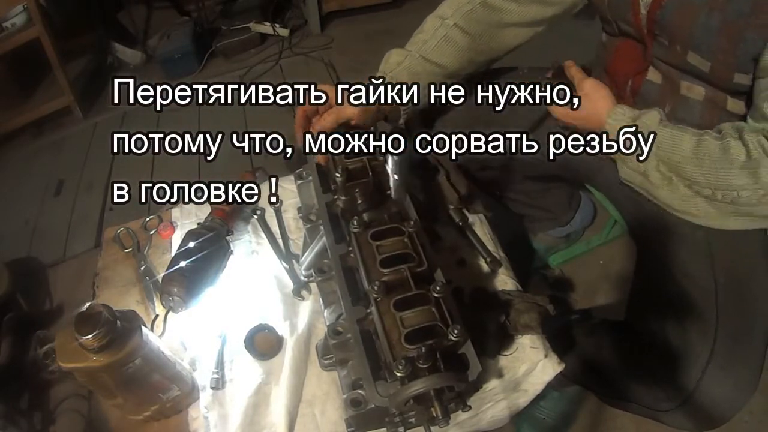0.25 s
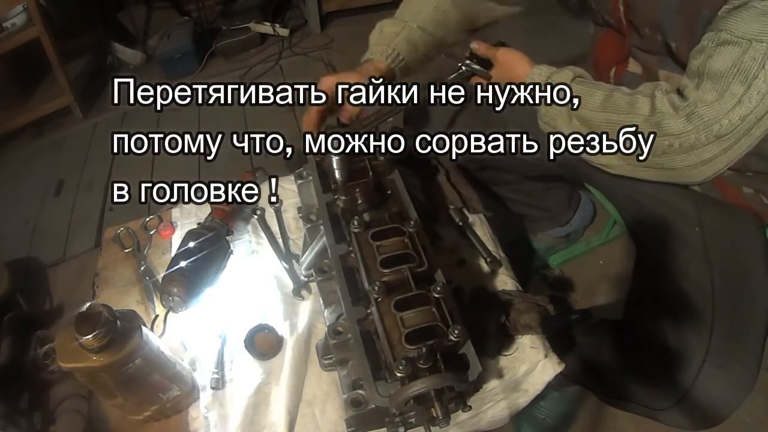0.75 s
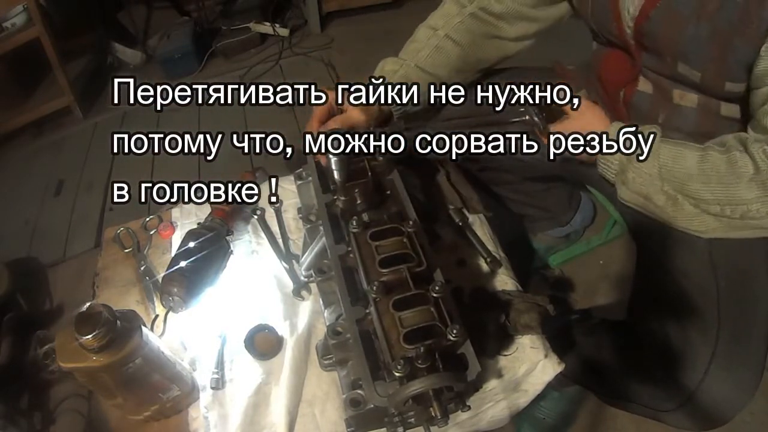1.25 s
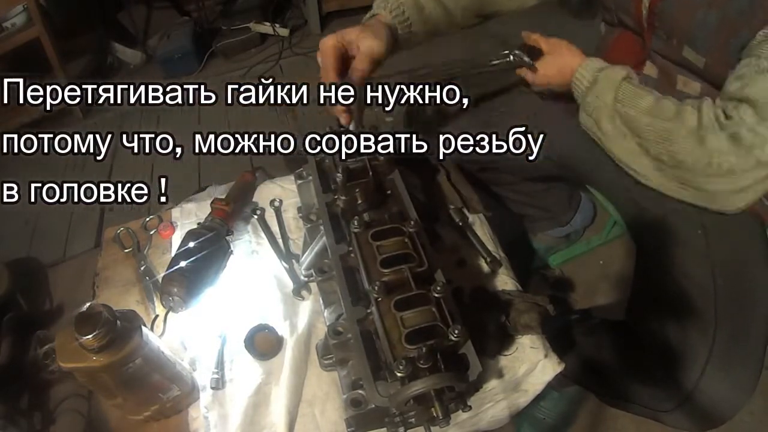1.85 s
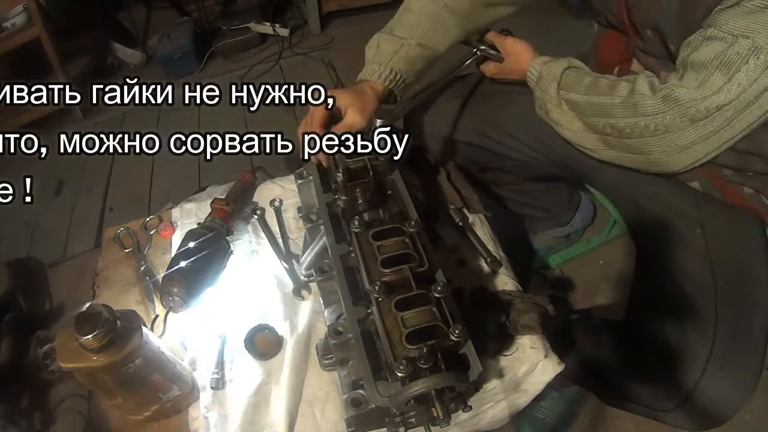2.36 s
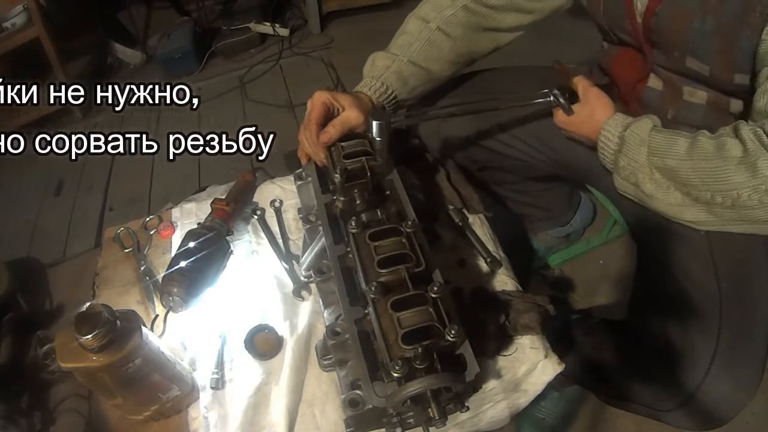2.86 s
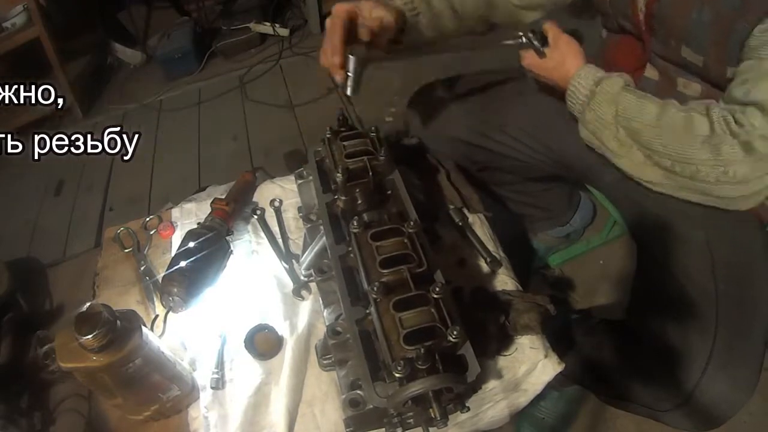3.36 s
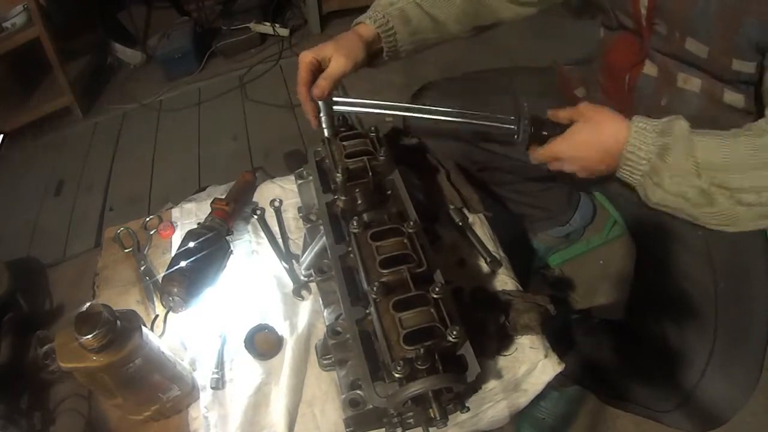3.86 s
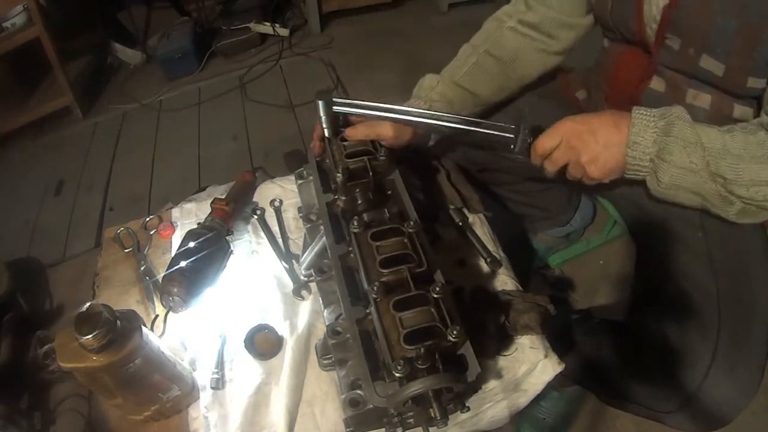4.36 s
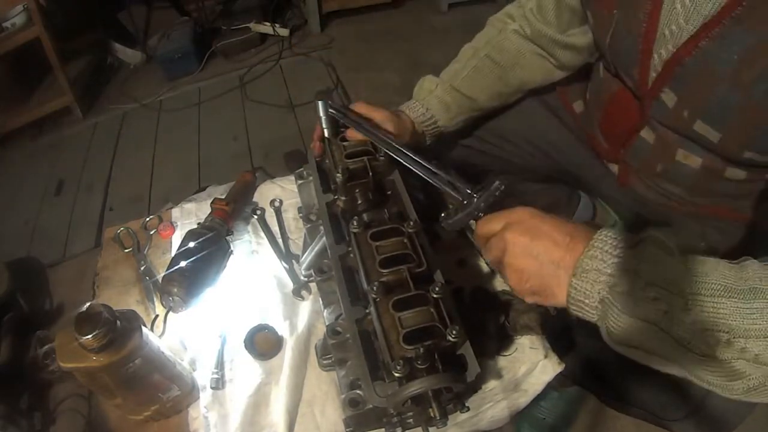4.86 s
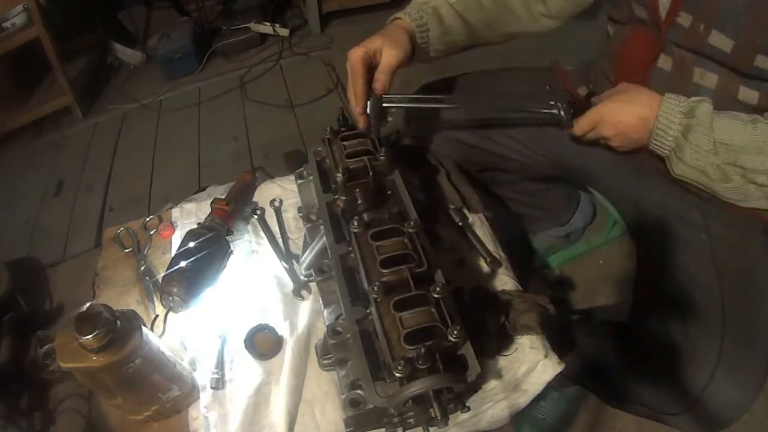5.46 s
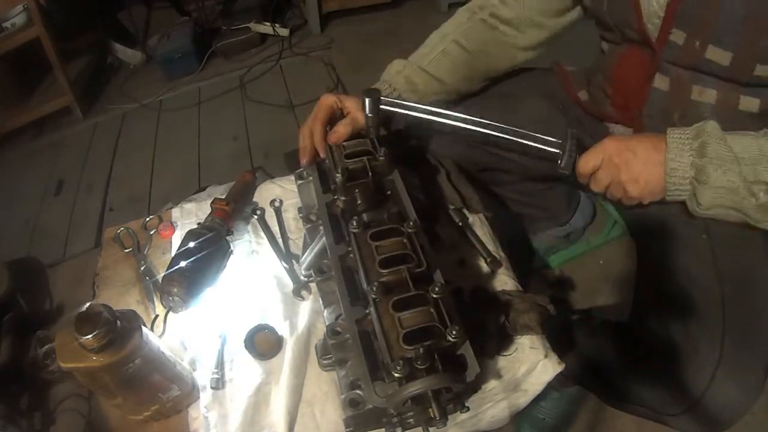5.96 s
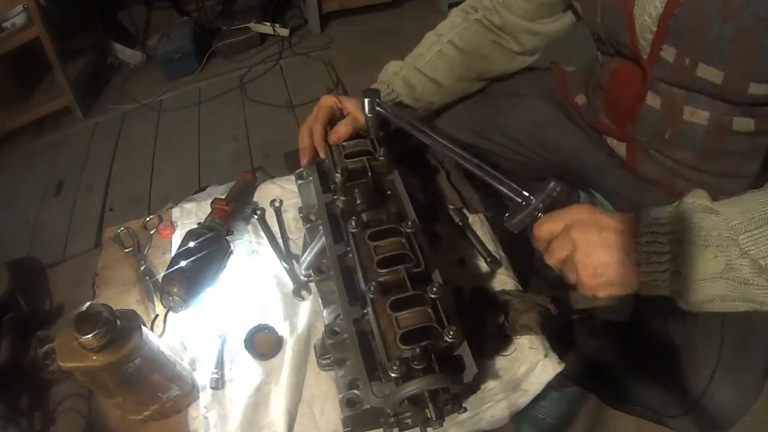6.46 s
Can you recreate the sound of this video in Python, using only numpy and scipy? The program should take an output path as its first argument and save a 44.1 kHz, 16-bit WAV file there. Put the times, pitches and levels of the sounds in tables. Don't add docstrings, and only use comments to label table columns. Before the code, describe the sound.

In a quiet workshop a metal socket snaps loudly onto a nut, then lighter taps, clicks and faint bumps over low hum and hiss.

```python
import sys
import numpy as np
from scipy import signal
from scipy.fft import rfft, irfft
from scipy.io import wavfile
from scipy.ndimage import uniform_filter1d

SR = 44100
rng = np.random.default_rng(int(sys.argv[2]) if len(sys.argv) > 2 else 0)


def how_loud(loudness_db):
    steps = np.asarray(loudness_db, float) / 20
    return 10 ** steps


def wav_out(sig):
    wavfile.write(sys.argv[1], SR, np.round(np.clip(np.atleast_2d(sig).T, -1, 1) * 32767).astype(np.int16))


N = 296352
TOP_HZ = 11080
T = np.arange(6000) / SR


def level(x, db):
    return x * how_loud(db) / np.sqrt(np.mean(x ** 2))


def peak(x, db):
    return x * how_loud(db) / np.max(np.abs(x))


def fade(t60):
    return np.exp(-np.log(1000) * T / np.clip(t60, 0.004, 0.4))


def ring(modes):
    return sum(how_loud(db) * fade(t60) * np.sin(2 * np.pi * hz * T) for hz, db, t60 in modes)


def after(x, response):
    return signal.fftconvolve(x, response, axes=-1)[..., :len(T)]


def shaped(points):
    hz, db = np.transpose(points)
    return lambda f: how_loud(np.interp(np.log(f), np.log(hz), db))


def hump(hz, width):
    return lambda f: 1 / np.sqrt(1 + ((f - hz * hz / f) / width) ** 2)


def noise(gain):
    hz = np.fft.rfftfreq(N, 1 / SR) + 1
    spectrum = rfft(rng.standard_normal(N))
    return irfft(spectrum * gain(hz) * (hz < TOP_HZ), N)


def walk(rate):
    hold = int(SR / rate)
    steps = np.repeat(rng.standard_normal(N // hold + 1), hold)
    return 1.295 * uniform_filter1d(uniform_filter1d(steps, hold), hold)[:N]


def causal(points):
    cepstrum = irfft(np.log(shaped(points)(np.fft.rfftfreq(1024, 1 / SR) + 1)))
    cepstrum[1:512] = 2 * cepstrum[1:512]
    cepstrum[513:] = 0
    return irfft(np.exp(rfft(cepstrum)))[:600]


def even(x, size):
    spectrum = rfft(x, 2 * len(T))
    power = uniform_filter1d(np.abs(spectrum) ** 2, size)
    return irfft(spectrum / np.sqrt(power))[..., :len(T)]


def gritty_push(length_ms, swell, white, catches):
    u = T / (length_ms / 1000)
    grit = how_loud(1.54 * np.repeat(catches, 24)[:len(T)])
    force = (u ** 0.17 + max(swell, 0) * u ** 2) * np.exp(-0.9 * u ** 2)
    return even(force * grit * white, size=120)


def wall_reflections(room_db, shut_ms, common, differing):
    sides = signal.lfilter(*signal.butter(1, 3020, fs=SR), differing)
    walls = common + 1.03 * sides * np.array([[1], [-1]])
    walls = even(walls * fade(0.14) * np.clip(T / 0.0073, 0, 1), size=50)
    answer_db = room_db + 9.5 * np.log2(min(shut_ms / 22.3, 1))
    return walls * how_loud(answer_db) / np.sqrt(np.sum(walls[0] ** 2))


def bench_thud(db):
    # f/Hz, level/dB, t60/s
    bench = [(166.6, 11.5, 0.045), (280, -13, 0.05), (564, -9, 0.028)]
    push = np.gradient(np.exp(-((T - 0.004) / 0.00035) ** 2))
    return peak(after(push, ring(bench)), db) * how_loud(np.array([[-1.2], [1.2]]))


def contact(kind, swell, room_db, thud_db, db, length_ms, shut_ms):
    colour, modes, ring_db = kind
    chance = rng.standard_normal((4, len(T)))
    scrape = gritty_push(length_ms, swell, chance[0], chance[3])
    clatter = peak(after(scrape, causal(colour)), 0)
    rings = sum(peak(after(scrape, ring([mode])), mode[1]) for mode in modes)
    rings = peak(rings, ring_db)
    scale = how_loud(db) / np.max(np.abs(clatter + rings))
    walls = wall_reflections(room_db, shut_ms, chance[1], chance[2])
    steel = clatter + rings + after((clatter + 0.43 * rings)[None], walls)
    gate = 1 - (1 - how_loud(-18)) * np.clip((1000 * T - shut_ms) / 5 + 0.5, 0, 1)
    return (scale * steel + bench_thud(db + thud_db)) * gate


def contacts(kind, events, swell, room_db, thud_db, right_db=0):
    out = np.zeros((2, N + len(T)))
    pan = how_loud(np.array([[-right_db], [right_db]]))
    for s, *row in events:
        i = int(s * SR)
        out[:, i:i + len(T)] += contact(kind, swell, room_db, thud_db, *row) * pan
    return out


def socket_on_nuts():
    # clatter colour (f/Hz, level/dB per Hz), modes (f/Hz, level/dB, t60/s), ring level/dB
    lift = ([(180, -42), (300, -5), (592, -32), (769, -17.5), (1940, -18), (2410, -3.5), (2730, -13),
             (5640, -15), (7220, -2.5), (12000, -34.5), (15600, -57), (22000, -120)], [(2360, -23, .08),
             (2412, -11, 0.15), (2500, -13, 0.098), (4720, -8, 0.05), (6370, -6, .03), (6885, -6, .07),
             (7030, -9, .05), (7400, 4.5, 0.07), (8130, -9, 0.07)], -1.3)
    snap = ([(180, -75), (300, -10), (620, -4), (1000, -30), (1320, 0), (2500, -30), (2990, -4),
             (4610, -29), (5810, -3), (6780, 11), (9680, -14), (12000, -7), (15600, -38), (22000, -120)],
             [(566, -15.5, 0.045), (1317, -10.5, 0.079), (1630, -25, .02), (3100, -16, 0.016),
             (4670, -6, 0.079), (4780, -9, 0.045), (4965, -2, 0.034), (5407, -7, 0.092), (6730, -5, 0.037),
             (6800, -4, .015), (7487, -17, 0.15), (8418, 8.5, 0.011), (8600, -17, .05), (9250, -6, 0.014)],
             0.5)
    seat = ([(180, -41), (300, -23), (639, 6.5), (912, -18), (1300, 7), (1590, -18), (2600, -0.5),
             (2990, -6), (6480, 1.5), (9530, 1), (11100, -9), (12000, -44), (15600, -74), (22000, -120)],
             [(635, -7, 0.028), (1301, -7, 0.096), (2570, -21, 0.032), (4500, -7, 0.053), (4930, 3, 0.017),
             (6440, -15, .04), (6630, 1, 0.016), (9640, -3, 0.026)], -6.5)
    slide = ([(180, -43), (300, -11.5), (1110, -14), (1320, -6.5), (2650, -21.5), (3390, -14.5),
              (5720, -15), (6890, -5), (10900, -21.5), (12000, -50), (15600, -77), (22000, -120)],
              [(1360, -8, .02), (6330, 6, 0.013), (7900, -3, 0.013)], -19)
    nudge = ([(180, -31), (300, -7), (1060, -8), (2130, -8.5), (2600, -12.5), (4400, -8.5), (4900, -22),
              (7100, -13), (10900, -27), (12000, -64), (15600, -90), (22000, -120)], [(1370, 11, 0.029),
              (2180, 7, 0.03), (7100, -8, 0.042)], -7)
    jog = ([(180, -35), (300, -6), (1280, -8), (2160, -7), (3000, -12), (4500, -10), (5000, -34),
            (6000, -26), (7000, -13), (8000, -22), (10900, -29), (12000, -64), (22000, -120)],
            [(1310, 0, .03), (2160, -1, .06), (3480, -5, .04), (4300, -7, .03), (7000, -7, .05)], -9)
    tap = ([(180, -24), (300, -7), (701, 2.5), (950, -16), (1470, 2.5), (2200, -3), (3200, -18),
            (4270, -4.5), (5720, -7), (6780, -4), (10600, -15), (12000, -52), (15600, -82), (22000, -120)],
            [(1466, -11, 0.04), (2210, -5, 0.038), (620, -9.5, 0.035), (4460, 0, 0.016), (5360, -17, .05),
            (6790, 14, 0.013), (7100, -13, 0.018), (7500, -14, .06)], 0.56)
    pull = ([(180, -32), (300, -7), (600, -9), (970, -29), (1260, -3.5), (2130, -16), (2770, -13),
             (3890, -17), (4830, -15), (9830, -25), (12000, -44), (15600, -74), (22000, -120)],
             [(1305, -6, 0.024), (2750, -9, 0.018), (4800, -2, 0.025), (5400, -11, .02), (7450, -2, 0.012),
             (9490, -7, .012)], -8)
    # t/s, peak level/dB, contact length/ms, gate shuts after/ms
    lifts = [
        (0.5053, -24.5, 4.2, 41),
    ]
    snaps = [
        (1.9589, -11, 1.7, 18.8),
    ]
    seats = [
        (2.0274, -14.5, 2.6, 16.8),
    ]
    slides = [
        (2.146, -31.5, 23, 37),
    ]
    grazes = [
        (2.016, -37.5, 5.7, 11),
    ]
    nudges = [
        (3.605, -49, 5.4, 11),
        (3.755, -46, 9.5, 20),
        (3.772, -47, 8, 22),
        (6.527, -45.5, 5.8, 14),
    ]
    jogs = [
        (3.5148, -38.5, 7.8, 34),
    ]
    taps = [
        (3.6166, -25.5, 3.3, 36),
        (3.629, -41, 4.6, 24),
    ]
    pulls = [
        (5.281, -28.5, 2.06, 12.6),
    ]
    return (contacts(lift, lifts, 1.9, -1.1, -23) + contacts(snap, snaps, 3.1, -1.5, -29.5)
            + contacts(seat, seats, 0.6, -0.4, -26) + contacts(slide, slides, 0.1, -1.4, -25.5)
            + contacts(nudge, grazes, 0.1, 4, -27) + contacts(nudge, nudges, 0.4, 2.5, -5)
            + contacts(jog, jogs, 1.5, 1.5, -5) + contacts(tap, taps, 3.1, -2.1, -23)
            + contacts(pull, pulls, 0.6, 1.5, -14))


def loose_steel():
    # clatter colour (f/Hz, level/dB per Hz), modes (f/Hz, level/dB, t60/s), ring level/dB
    rattle = ([(180, -31), (300, -13), (793, -8), (870, -22), (1300, -3), (1910, -11.5), (8160, -12.5),
               (10400, -31), (12000, -47), (15600, -74), (22000, -120)], [(1320, -8, 0.02),
               (6540, 0, 0.05)], -14)
    clack = ([(180, -33), (300, -3), (800, -7), (1300, -3), (1900, -12), (3200, -16), (4700, -10.5),
              (6300, -16), (8100, -9), (10400, -28), (12000, -47), (22000, -120)], [(1270, -9, 0.01),
              (4700, -5, .01), (7640, -2, .08), (8120, 3, .01)], -19)
    tick = ([(290, -49), (500, -6), (1050, -24), (1770, -4), (2400, -18), (3100, -10), (3800, -22),
             (4550, -15), (5600, -24), (8000, -10), (12000, -38), (15600, -58), (22000, -120)],
             [(1700, 0, 0.008), (3050, -2, 0.006), (4550, -1, .006), (7570, 1, .007), (8200, 1, .007)], -1.5)
    flick = ([(3000, -10), (5500, -20), (7000, 3), (9000, -4.5), (11000, -14), (13000, -40)],
              [(7060, 0, 0.025)], -12)
    # t/s, peak level/dB, contact length/ms, gate shuts after/ms
    rattles = [
        (0.5768, -43, 5.7, 30),
        (0.581, -42.5, 13, 26),
    ]
    clacks = [
        (0.6069, -34.5, 2.8, 35),
    ]
    ticks = [
        (5.359, -32.5, 1.46, 6),
        (3.794, -47, 1.2, 6),
        (6.38, -50, 1.5, 10),
    ]
    # t/s, peak level/dB, gate shuts after/ms
    flick_times = [
        (0.735, -52, 16),
        (1.82, -56, 25),
        (3.279, -50.5, 14),
        (3.732, -50, 8),
        (3.7489, -42.5, 7),
        (5.035, -50, 9.5),
        (5.046, -44.5, 12),
        (6.502, -54, 18),
    ]
    flicks = [(s, db, 5.2, shut_ms) for s, db, shut_ms in flick_times]
    return (contacts(rattle, rattles, 0.1, -0.2, -14) + contacts(clack, clacks, 0.6, 0.1, -11)
            + contacts(tick, ticks, 1.1, -6, -18) + contacts(flick, flicks, 0.6, 0.3, -18))


def brushing():
    # colour (f/Hz, level/dB per Hz), modes (f/Hz, level/dB, t60/s), ring level/dB
    cloth = ([(500, -33), (1200, -10), (2000, -7.5), (3200, -15), (6000, -18.5), (12000, -42)],
              [(1900, 0, 0.0047)], -23)
    rub = ([(2000, -32), (4000, 0), (5000, 0.5), (7500, 1), (10500, -1), (13000, -38)], [(7800, 0, .004)],
            -20)
    # t/s, peak level/dB, length/ms
    cloth_strokes = [
        (1.85, -57.5, 20),
        (3.35, -50.5, 63),
        (3.97, -56, 95),
        (4.56, -54.5, 107),
        (5.76, -53.5, 99),
    ]
    rub_strokes = [
        (3.761, -52.5, 24),
        (3.82, -51.5, 90),
        (5.33, -52, 22),
        (6.36, -52.5, 45),
    ]
    cloths = [(s, db, ms, ms + 30) for s, db, ms in cloth_strokes]
    rubs = [(s, db, ms, ms + 9.7) for s, db, ms in rub_strokes]
    return contacts(cloth, cloths, 0.3, -4, -22) + contacts(rub, rubs, 0.6, -3, -19)


def knee_on_bench():
    # colour (f/Hz, level/dB per Hz), modes (f/Hz, level/dB, t60/s), ring level/dB
    bump = ([(180, -19), (380, -1), (769, 1), (1050, -15), (1770, -3.5), (2550, -10.5), (3700, -14.5),
             (4500, -24), (9090, -25), (10900, -22), (12000, -73), (15600, -103), (22000, -120)],
             [(330, -9, .04), (453, 3, 0.04), (1750, 1.5, 0.027), (2550, -6, .02), (3440, -7, 0.017)], -1.4)
    # t/s, peak level/dB, contact length/ms, gate shuts after/ms
    knocks = [
        (3.198, -53, 2.9, 10),
        (6.53, -54, 3, 17),
        (6.546, -53, 2.3, 12),
    ]
    bumps = [
        (3.586, -57, 12, 28),
        (6.551, -47, 6, 14),
        (6.558, -44, 6.5, 13),
        (6.564, -40.5, 8.5, 22),
        (6.576, -44, 7, 14),
        (6.588, -47, 4, 7.4),
        (6.602, -51, 4.8, 9),
        (6.615, -45.5, 3, 9.2),
    ]
    return contacts(bump, knocks, 0.1, -0.2, 5.5, 1.8) + contacts(bump, bumps, 0.6, 1.5, -10.5, 1.8)


def wrench():
    out = socket_on_nuts() + loose_steel() + brushing() + knee_on_bench()
    return signal.sosfilt(signal.butter(3, 105, "high", fs=SR, output="sos"), out[:, :N])


def motor():
    # t/s, f/Hz
    speed = [(0.0, 316.2), (0.6, 315), (1.23, 311.5), (1.68, 316), (2.09, 309.6), (2.3, 319.1),
             (3.55, 314.9), (5.26, 323.1), (6.27, 314.8), (6.61, 320.7), (6.72, 310)]
    # f/Hz, width/Hz, level/dB
    casing = [(202.6, 11.3, -74.5), (97.5, 21, -77)]
    t = np.arange(N) / SR
    hz = np.interp(t, *np.transpose(speed))
    phase = 2 * np.pi * np.cumsum(hz + 2.64 * walk(13)) / SR
    db = -62 + 0.47 * (hz - 316)
    tone = np.sqrt(2) * how_loud(db + 1.3 * walk(17)) * np.sin(phase + np.array([[-0.21], [0.21]]))
    whine_phase = 2 * np.pi * np.cumsum(500.8 + 5 * walk(10)) / SR
    whine = how_loud(-67.5 + 2.0 * walk(14)) * np.sin(whine_phase)
    drones = sum(level(noise(hump(f, width)), d) for f, width, d in casing)
    return tone * how_loud(np.array([[-0.7], [0.7]])) + (whine + drones) * how_loud(np.array([[-1.8], [1.8]]))


def sleeves():
    # t/s, strength level/dB
    moves = [
        (0.67, 4),
        (2.08, 7),
        (3.68, 6.5),
        (5.3, 8.5),
        (6.72, 5),
    ]
    t = np.arange(N) / SR
    stir_db = sum(db * np.interp(t - s, [-0.35, 0, 0.34], [0, 1, 0]) for s, db in moves)
    dull = how_loud(-72 + stir_db + 2.25 * walk(60)) * level(noise(hump(1900, 1600)), 0)
    bright = how_loud(-75.5 + 0.17 * stir_db + 2.25 * walk(60)) * level(noise(hump(8000, 5000)), 0)
    return dull + bright


def hiss():
    # f/Hz, level/dB per Hz
    mid_colour = [(15, -41), (25, -12), (192, -12.5), (247, -15), (311, -5.5), (391, -14), (492, -12),
                  (668, -13.5), (740, -12), (979, -17), (2330, -22), (9200, -26.5), (11000, -29.5),
                  (14300, -77), (22000, -120)]
    side_colour = [(15, -50), (25, -26), (141, -18), (169, -17), (197, -12), (281, -14), (311, -12),
                   (433, -9.5), (505, -9.5), (1080, -9), (11000, -30), (14300, -62), (22000, -120)]
    mid = level(noise(shaped(mid_colour)), -61.5)
    side = level(noise(shaped(side_colour)), -59.5)
    return (mid + side * np.array([[1], [-1]])) * how_loud(0.5 * walk(2.01) + np.array([[-0.4], [0.4]]))


def scene():
    return wrench() + motor() + sleeves() + hiss()


def roll_off(x):
    return signal.sosfilt(signal.butter(12, 12160, fs=SR, output="sos"), x)


def record(dry):
    dull = signal.sosfilt(signal.ellip(6, 0.2, 27, TOP_HZ, fs=SR, output="sos"), dry)
    return roll_off(dull)


dry = scene()
out = record(dry)
wav_out(out)
```